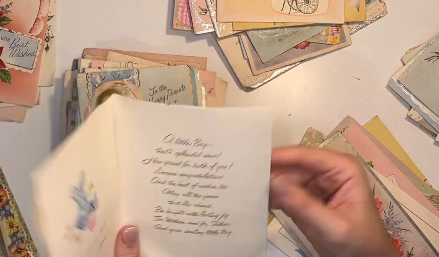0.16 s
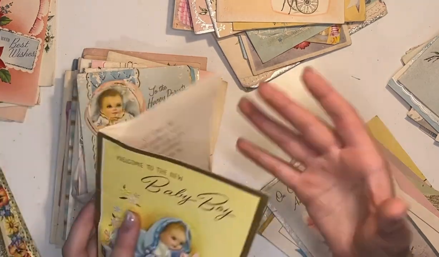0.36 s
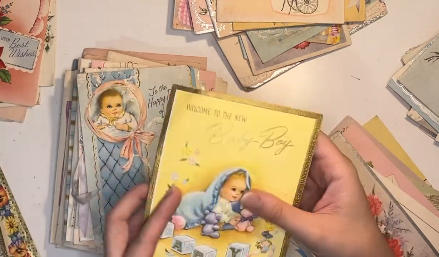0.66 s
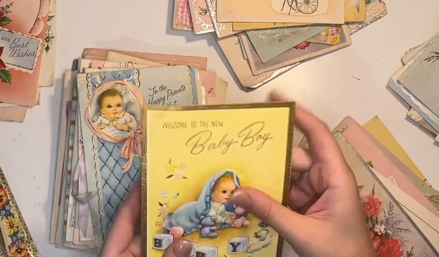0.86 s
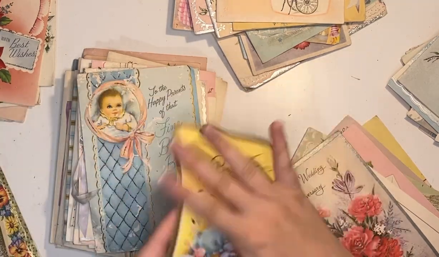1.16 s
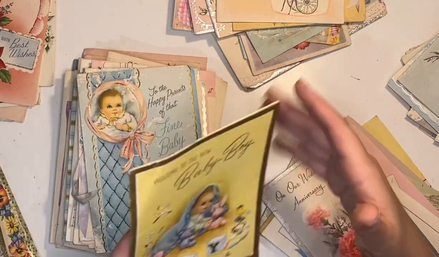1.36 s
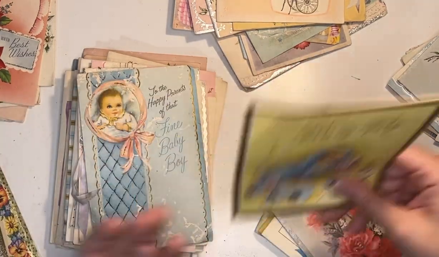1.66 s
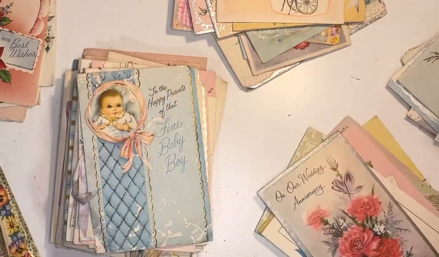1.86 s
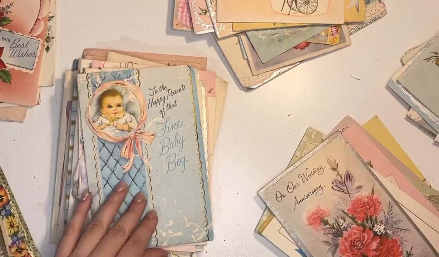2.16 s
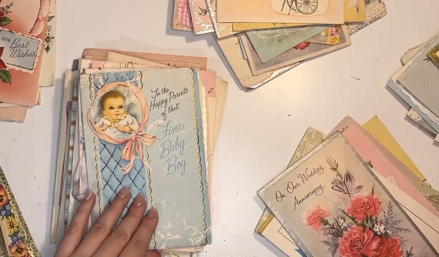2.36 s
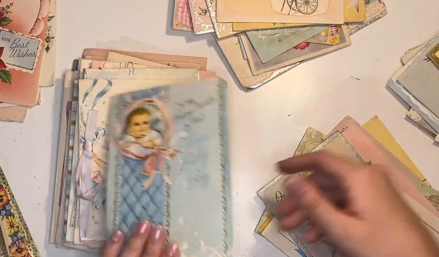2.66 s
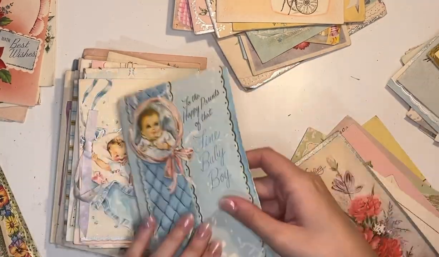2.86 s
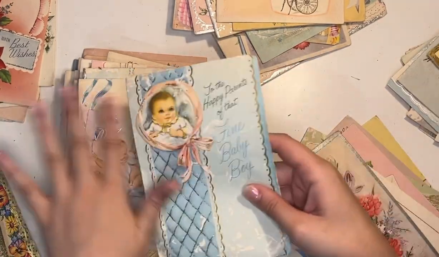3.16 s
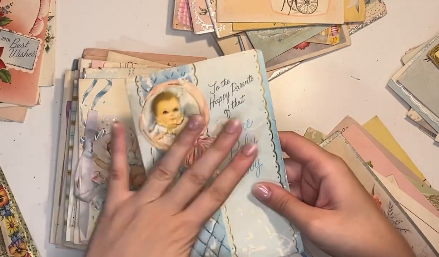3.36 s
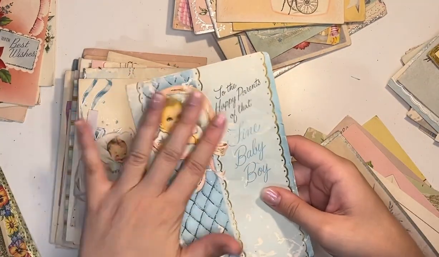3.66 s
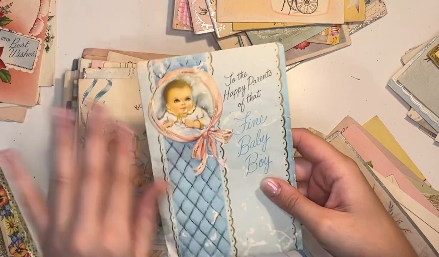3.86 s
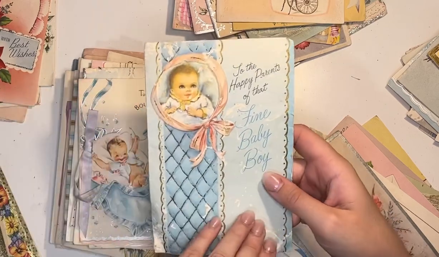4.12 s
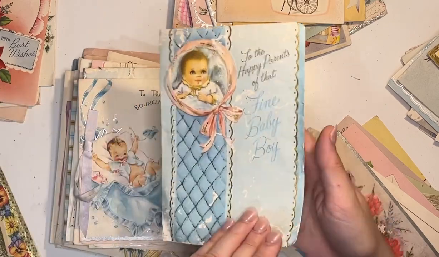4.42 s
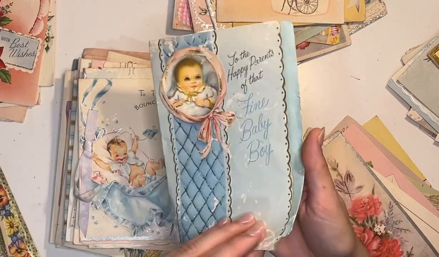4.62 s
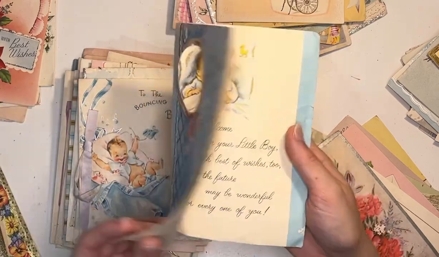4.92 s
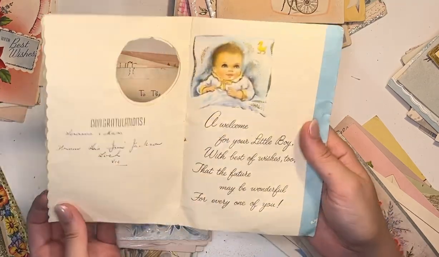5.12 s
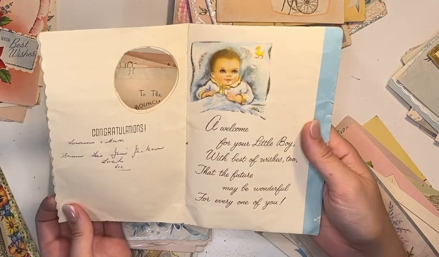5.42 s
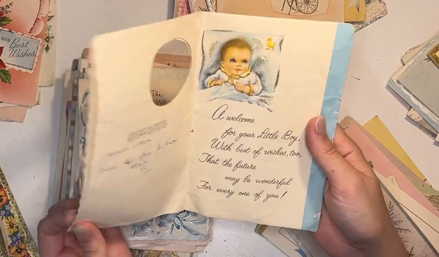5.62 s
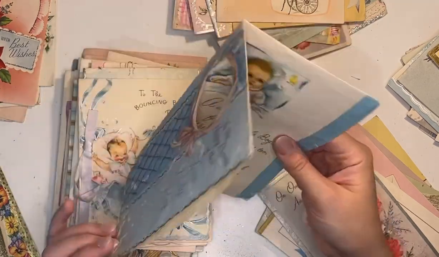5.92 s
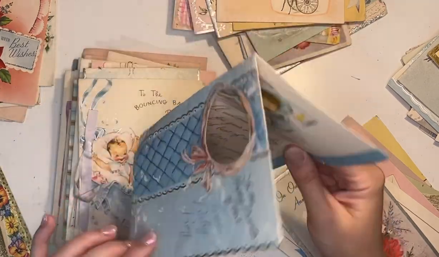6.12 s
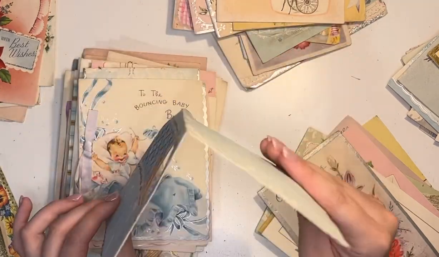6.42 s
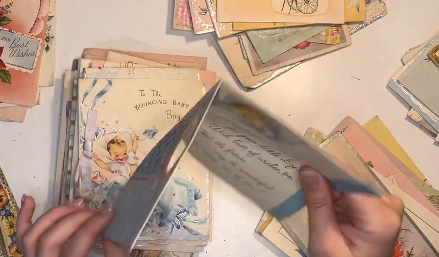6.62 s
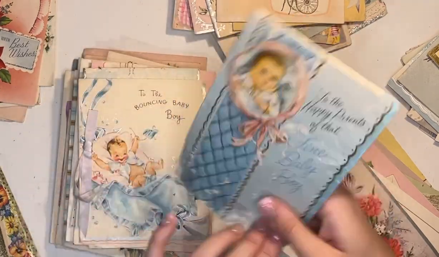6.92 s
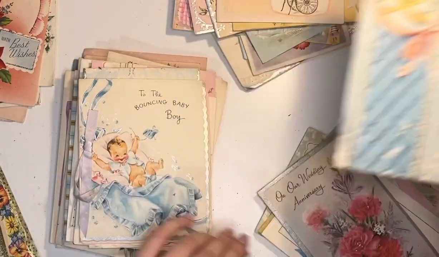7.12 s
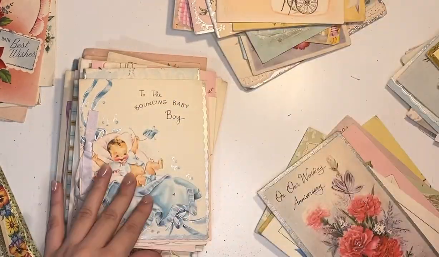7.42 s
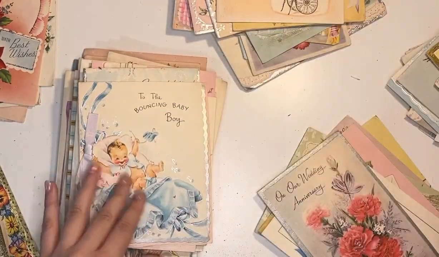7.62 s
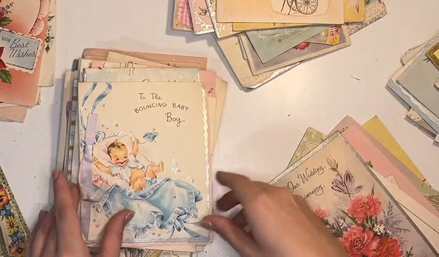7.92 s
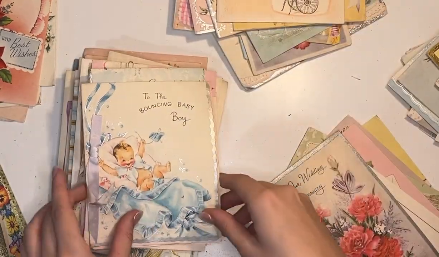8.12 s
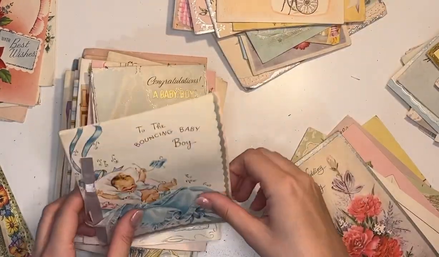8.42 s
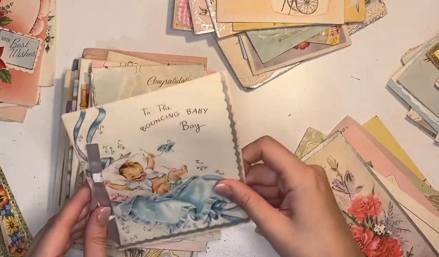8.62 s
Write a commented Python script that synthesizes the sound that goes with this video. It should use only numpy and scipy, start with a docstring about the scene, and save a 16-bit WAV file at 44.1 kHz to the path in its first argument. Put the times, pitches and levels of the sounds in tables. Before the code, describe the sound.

Old greeting cards are opened, flipped and tapped by hand, with irregular papery rustles, sharp little knocks and short hollow bumps, over faint rumble.

```python
"""Hands open, brush, flip and tap paper cards on a table, heard close and in stereo.
From the start skin and paper slide with a grainy hiss of filtered clicks, the sheets flap as resonances,
and fingertips tap and creases snap as short noise bursts. From 3 s dragged edges also ring with a
gliding pitch; from 6 s a half-open card booms as a decaying sine.
Throughout, a low rumble over faint hiss fills the small quiet room and scattered echoes follow the cards."""
import sys
import numpy as np
from scipy import signal
from scipy.fft import rfft, irfft
from scipy.io import wavfile
from scipy.ndimage import uniform_filter1d

SR = 44100
rng = np.random.default_rng(int(sys.argv[2]) if len(sys.argv) > 2 else 0)


def transcribe(u):
    """Save the signal u as a 16-bit wav file named by the first command-line argument.

    u: samples, shape (n,) or (channels, n), limited to [-1, 1]; the rate is SR.
    q: integer samples, one column per channel.
    """
    v = np.clip(np.atleast_2d(u).T, -1, 1)
    q = np.round(v * 32767).astype(np.int16)
    wavfile.write(sys.argv[1], SR, q)


N = 387198  # samples

# Strokes of skin or paper over paper:
# start t/s, length/s, hiss level at the end/dB, swell from start to end/dB
STROKE_EVENTS = [(0.0, 0.04, -60.5, -4.5), (0.053, 0.1, -44, 10), (0.235, 0.055, -53, 30),
                 (0.377, 0.11, -50, 6.5), (0.512, 0.22, -66.5, -19.5), (0.744, 0.17, -57.5, 19),
                 (1.129, 0.075, -42, 1), (1.293, 0.19, -73.5, -10.5), (1.488, 0.032, -48.5, 0),
                 (1.566, 0.045, -42, 10), (1.69, 0.33, -81.5, -24), (2.062, 0.28, -73.5, -14.5),
                 (2.445, 0.34, -55, 12), (2.841, 0.024, -48, 28), (2.961, 0.16, -34, 33.5),
                 (3.397, 0.034, -36.5, 9.5), (3.66, 0.049, -36.5, 16.5), (4.091, 0.023, -74, -7.5),
                 (4.224, 0.44, -51, 12), (4.709, 0.019, -40, 28), (4.83, 0.23, -54.5, 27),
                 (5.071, 0.03, -42.5, 16), (5.475, 0.068, -54, 21), (5.693, 0.11, -50.5, 12.5),
                 (5.855, 0.32, -65.5, -7.5), (6.24, 0.038, -60.5, 10), (6.404, 0.32, -51.5, 27.5),
                 (6.799, 0.15, -43, 15.5), (6.987, 0.056, -47, 11), (7.218, 0.13, -64, 33.5),
                 (7.376, 0.13, -62.5, -10.5), (7.686, 0.22, -73, 38), (8.019, 0.18, -72.5, -9),
                 (8.174, 0.16, -62.5, -8.5), (8.42, 0.056, -71, 8), (8.458, 0.29, -58.5, 5.5)]
# Spectrum of the sliding hiss: f/Hz, relative level per Hz/dB
HISS_SPECTRUM = [(1500, -14), (2120, -8.5), (2930, -14), (7000, -13), (9100, -13.5), (14000, -14),
                 (15800, -27)]
# Contact closes over GRIP_S; the hiss dies as the hand lifts
GRIP_S, LIFT_DB_PER_S = 0.0062, 259.5
# How hard the sheet flexes: t/s, flap level/dB
FLEX_CURVE = [(0.0, -68.5), (.49, -52), (.96, -86), (1.48, -68.5), (1.81, -92), (2.6, -87.5), (3.05, -58.5),
              (3.3, -88), (3.62, -72), (3.9, -104), (4.3, -70), (4.7, -53), (5.04, -76.5), (5.32, -101),
              (5.9, -69), (6.52, -78), (6.93, -51), (7.15, -85), (7.86, -90), (8.28, -76), (8.78, -67.5)]
# Modes of a flexing card: f/Hz, filter width/Hz, relative level/dB
SHEET_MODES = [(119, 35, 5), (287, 600, 0.5), (623, 220, -1), (956, 190, 1.5)]
# Modes of a scraped edge: f/Hz, filter width/Hz, relative level/dB
EDGE_MODES = [(2100, 600, 9.5), (2970, 2050, 2)]
EDGE_OVER_FLAP_DB = -3  # a flexing sheet also scrapes its edge
# Jerks of a dragged edge: start t/s, length/s, top level/dB, ring from f/Hz, ring to f/Hz
DRAG_EVENTS = [(3.012, 0.075, -56.5, 2050, 2700), (3.085, 0.022, -49, 2070, 3200),
               (4.372, 0.027, -49, 5030, 4000), (4.407, 0.039, -50.5, 3890, 3100),
               (4.458, 0.2, -47, 2800, 2000), (4.645, 0.062, -48.5, 5200, 2300)]
DRAG_SWELL_DB, DRAG_FADE_DB_PER_S = 2, 898
DRAG_RING_DB, DRAG_WIDTH_HZ = -1, 1200  # gliding ring: level over the pull, filter width
# Taps and snaps: t/s, level of the knock/dB, sheet pitch f/Hz,
# nominal crack level over the knock/dB, thud level over the knock/dB
TAP_EVENTS = [(0.059, -38, 2040, -19, -3), (0.078, -40.5, 2000, -14, -6.5), (0.176, -28.5, 1770, -26, -3.5),
              (0.322, -33, 2580, 3.5, -7), (0.345, -33, 2630, -23, -30), (0.449, -37.5, 1220, -23, 0.5),
              (0.472, -30.5, 1450, -30, -40), (0.649, -41.5, 495, 7, 0), (0.833, -42, 600, -8, -0.5),
              (1.132, -26, 520, -19.5, -1), (1.149, -27.5, 2650, -3.5, -22), (1.309, -28.5, 990, -26, -6.5),
              (1.603, -36.5, 1000, 8.5, -3), (1.959, -47.5, 620, -21, -2), (1.976, -41, 720, -22, -2.5),
              (2.067, -47.5, 1260, 4.5, 3), (2.557, -28, 2020, -24, -27), (2.752, -40, 990, 4, -8),
              (2.853, -45, 2820, -12.5, -7.5), (2.873, -26, 650, -18.5, -16), (2.933, -31, 660, -17.5, -2),
              (3.129, -27.5, 860, 1.5, -3.5), (3.136, -23, 2160, -6, -21), (3.144, -32, 780, 15, 2.5),
              (3.153, -44, 1010, -18.5, -17.5), (3.397, -38.5, 585, -5, 9.5), (3.447, -27, 700, 1, -4),
              (3.457, -18.5, 620, -9.5, -11.5), (3.468, -34, 1320, -14, -16),
              (3.667, -37.5, 593, -27.5, 1.5), (3.721, -30, 770, -21, -4), (4.226, -35.5, 810, -45, -4),
              (4.725, -31, 956, -32, -7), (4.741, -23.5, 2460, -30, -8), (5.062, -42, 596, -31.5, 6),
              (5.083, -36, 623, -19, -3), (5.146, -31.5, 2820, -2, -5.5), (5.733, -35, 800, -24, -1),
              (5.774, -37.5, 500, -19, 1), (5.98, -49, 705, -5.5, 8), (6.085, -26.5, 1440, -43, -5.5),
              (6.296, -45.5, 675, -31, 8), (6.534, -47, 750, -31, 3), (6.572, -48.5, 1840, -32, 10.5),
              (6.8, -45, 2500, -21.5, -4), (6.85, -40.5, 1520, 4, -5.5), (6.879, -39, 1110, -16, -1),
              (6.948, -30.5, 510, -19, -2.5), (6.975, -36.5, 2100, -13, -17),
              (7.043, -30.5, 2010, -20, -8.5), (7.439, -50.5, 800, -18, 1), (8.192, -34, 2130, -12, -34),
              (8.212, -27, 1750, -31, -15.5), (8.426, -48.5, 1050, -23, -10),
              (8.576, -50.5, 605, -18, -7.5)]
# Modes of a struck card: f/Hz, filter width/Hz, relative level/dB
KNOCK_MODES = [(640, 160, 1), (1210, 370, 4.5), (1740, 500, 1.5)]
# Hard taps are short, soft ones linger: knock level/dB, decay time of the blow by 60 dB/s
TAP_DECAY = [(-46, 0.05), (-38, 0.03), (-28, 0.022)]
# Snaps of creases in the paper: t/s, peak level/dB
CREASE_SNAPS = [(0.0588, -55), (0.08, -36), (0.27, -51), (0.2867, -50), (0.343, -24.5), (0.62, -42),
                (0.728, -42), (0.795, -47), (1.196, -25), (2.069, -44), (3.717, -21), (5.264, -54),
                (5.3132, -58), (5.4076, -56), (5.4282, -53), (5.455, -57), (5.4814, -65), (6.0247, -39),
                (6.868, -32), (7.5794, -46.5),]
# Booms of the half-open card, like a small box: t/s, initial level/dB
BOX_BOOMS = [(6.089, -21.5), (6.121, -34), (6.143, -45), (6.16, -46), (6.407, -40), (6.976, -33),
             (7.075, -37), (7.224, -52)]
BOX_HZ, BOX_T60_S = 302, 0.057
# Stereo width: f/Hz, side over mid level/dB
SIDE_OVER_MID = [(40, -11), (150, -14), (700, -6.5), (1250, -4.5), (1600, 6.5), (1750, -11.5), (2400, -14),
                 (4500, -45.5), (6000, -22), (11000, -20), (14000, -28.5)]
# Spectrum of the room's air: f/Hz, relative level per Hz/dB
AIR_SPECTRUM = [(26, -46), (40, -7), (55, -8.5), (120, -14), (220, -30.5), (450, -37), (2900, -59.5),
                (3300, -45.5), (3700, -56), (15500, -47)]
AIR_DB, AIR_SWELL_DB = -64, 2.5  # middle level, rms size of its swell
# Phase of right over left: f/Hz, phase/turns
STEREO_PHASE = [(5200, 0), (5600, .1), (7300, .3), (7900, .5), (8900, .5), (9400, .62), (10900, .92),
                (11300, 1), (12900, 1), (13400, 1.18), (14400, 1.4), (15000, 1.5)]
BAND_EDGE_HZ = 15860


def handling():
    """Friction and flexure: sliding hisses, a dragged edge rings, the sheet flaps and shakes the table."""
    t = np.arange(N) / SR
    flap_db = np.interp(t, *np.transpose(FLEX_CURVE))
    fine = grit(per_s=2400, spread_db=1.5, smooth=0.7, flutter_db=1.35)
    coarse = grit(per_s=650, spread_db=0.5, smooth=0.78, flutter_db=7.0)
    rasp = grit(per_s=1900, spread_db=5.0, smooth=1.2, flutter_db=2.5)
    fibre_snaps = grit(per_s=81, spread_db=5.5, smooth=0, flutter_db=1.5)
    crackle = ring(fibre_snaps, [(3700, 12000, 0)])

    grain = patchy(colour(fine, HISS_SPECTRUM), patch_db=2.5)
    hiss = strokes(t) * (grain + amp(-14) * crackle)

    pull, ring_hz = drag(t)
    edge = (amp(flap_db + EDGE_OVER_FLAP_DB) + pull) * ring(rasp, EDGE_MODES)
    edge += amp(DRAG_RING_DB) * pull * glide(rasp, ring_hz, DRAG_WIDTH_HZ)

    flap = amp(flap_db) * ring(coarse, SHEET_MODES)
    shake_db = -57.0 + 0.27 * (flap_db + 54.0)  # the table follows the flap only in part
    table_modes = [(55.0, 24, 1.0), (94, 170, -18.0)]
    shake = amp(shake_db) * ring(rng.standard_normal(N), table_modes)
    return hiss + edge + flap + shake


def strokes(t):
    """Addition of incoherent powers: each stroke grips, swells or slackens evenly in dB, and dies away."""
    power = np.zeros(N)
    for start, length, end_db, swell_db in STROKE_EVENTS:
        first = max(round((start - GRIP_S) * SR), 0)
        at = slice(first, round((start + length + .4) * SR))
        left = start + length - t[at]  # seconds to the end; negative during the lift
        level_db = end_db - swell_db * np.clip(left / length, 0, 1)
        level_db += LIFT_DB_PER_S * np.minimum(left, 0)
        grip = np.clip(1 + (t[at] - start) / GRIP_S, 0, 1)
        power[at] += (grip * amp(level_db)) ** 2
    return np.sqrt(power)


def grit(per_s, spread_db, smooth, flutter_db):
    """Stick-slip of fibres: sparse clicks of uneven size in smooth noise, with an uneven grip."""
    size = amp(spread_db * np.minimum(rng.exponential(1, N), 4))
    clicks = size * (rng.random(N) < per_s / SR)
    clicks *= rng.choice([-1., 1.], N)
    grip = uniform_filter1d(rng.standard_normal(N), size=400)
    grip = evened(uniform_filter1d(grip, size=400))
    return (evened(clicks) + smooth * rng.standard_normal(N)) * amp(flutter_db * grip)


def patchy(x, patch_db):
    """Modulation by moving contact over the paper's grain: bands swell and fade in small patches."""
    bands = signal.stft(x, nperseg=256)[2]
    # smoothed over about 35 ms and 1 kHz
    patches = uniform_filter1d(rng.standard_normal(bands.shape), size=12, axis=1)
    patches = uniform_filter1d(patches, size=6, axis=0)
    bands = bands * amp(patch_db * evened(patches))
    return evened(signal.istft(bands, nperseg=256)[1][:N])


def drag(t):
    """Jerky friction: each jerk swells a little and stops short; gives the gain and the ring's pitch."""
    gain, hz = np.zeros(N), np.full(N, float(DRAG_EVENTS[0][3]))
    for start, length, top_db, from_hz, to_hz in DRAG_EVENTS:
        done = np.clip((t - start) / length, 0, 1)
        level_db = top_db - DRAG_SWELL_DB * (1 - done)
        level_db -= DRAG_FADE_DB_PER_S * np.maximum(t - start - length, 0)
        grip = np.clip((t - start) / GRIP_S, 0, 1)
        gain = np.maximum(gain, grip * amp(level_db))
        hz = np.where(t >= start, from_hz + (to_hz - from_hz) * done, hz)
    return gain, hz


def glide(x, hz, width_hz):
    """Heterodyne resonance: shifts the curve hz down to zero, smooths there, and shifts back."""
    turn = np.exp(2j * np.pi * np.cumsum(hz) / SR)
    r = np.exp(-np.pi * width_hz / SR)
    smoothed = signal.lfilter([1], np.convolve([1, -r], [1, -r]), x / turn)
    return evened((turn * smoothed).real)


def taps():
    """Impact excitation: a short crack, the card's knock with the struck patch ringing, a dull thud."""
    out, t = np.zeros(N + 6000), np.arange(6000) / SR
    fingertip = signal.butter(4, 3600, fs=SR, output="sos")  # softness removes treble
    thud_modes = [(297, 170, -1.5), (189.4, 223, 3), (385.0, 540, -1.5)]
    noises = rng.standard_normal((len(TAP_EVENTS), 3, 6000))
    for (s, db, hz, crack_db, thud_db), (blow_noise, crack_noise, thud_noise) in zip(TAP_EVENTS, noises):
        t60 = np.interp(db, *np.transpose(TAP_DECAY))
        blow = blow_noise * np.minimum(t / 0.001, 1) * amp(-60 * t / t60)
        blow = signal.sosfilt(fingertip, blow)
        knock = ring(blow, [(hz, 0.39 * hz + 60, 0)]) + 0.52 * ring(blow, KNOCK_MODES)
        bright = crack_noise - 0.78 * np.roll(crack_noise, 1)
        crack = bright * (amp(-60 * t / 0.029) + 0.54 * amp(-60 * t / 0.091))  # snap, then a short fizz
        thud = ring(thud_noise * amp(-60 * t / (3.43 * t60)), thud_modes)
        tap = knock / abs(knock).max()
        tap += amp(crack_db) * crack / 3 + amp(thud_db) * thud / abs(thud).max()
        out[round(s * SR):][:6000] += amp(db) * tap
    return out[:N]


def ticks():
    """Sudden release of creases: snaps a few milliseconds long, to which the sheet lends its middle ring."""
    out, t = np.zeros(N), np.arange(600) / SR
    for (s, db), noise in zip(CREASE_SNAPS, rng.standard_normal((len(CREASE_SNAPS), 600))):
        snap = noise * amp(-60 * t / 0.0085)
        snap = snap + 1.8 * resonate(snap, 3000, 3500)
        out[round(s * SR):][:600] += amp(db) * snap / abs(snap).max()
    return out


def hollow():
    """Cavity resonance: one low mode, slightly detuned each time, starts softly and decays."""
    out, t = np.zeros(N), np.arange(6000) / SR
    for (s, db), detune in zip(BOX_BOOMS, rng.standard_normal(len(BOX_BOOMS))):
        hz = BOX_HZ * (1 + 0.028 * detune)
        boom = np.sin(2 * np.pi * hz * t) * np.minimum(t / 0.0023, 1)
        out[round(s * SR):][:6000] += amp(db - 60 * t / BOX_T60_S) * boom
    return out


def scatter(x, t60):
    """Diffuse reverberation: dense reflections of random sign and size that die away exponentially."""
    t = np.arange(round(SR / 2)) / SR
    tail = rng.standard_normal(len(t)) * amp(-60 * t / t60)
    return signal.oaconvolve(x, tail / np.linalg.norm(tail))[:N]


def decorrelated(x):
    """Decorrelation: random phase, smoothed over time and pitch, makes the side diffuse."""
    bands = signal.stft(x, nperseg=512)[2]
    phase = uniform_filter1d(rng.standard_normal(bands.shape), size=6, axis=1)
    phase = uniform_filter1d(phase, size=3, axis=0)
    bands = bands * np.exp(3j * evened(phase))  # 3 rad rms
    return signal.istft(bands, nperseg=512)[1][:N]


def room_air():
    """Stationary background noise: a low rumble over a faint hiss, together swelling slowly."""
    swell = evened(uniform_filter1d(rng.standard_normal(N), size=6000))
    air = evened(colour(rng.standard_normal(N), AIR_SPECTRUM))
    return amp(AIR_DB + AIR_SWELL_DB * swell) * air


def amp(db):
    """Definition of the decibel: level to amplitude ratio."""
    return 10 ** (np.asarray(db) / 20)


def evened(x):
    """Normalization to an rms value of 1."""
    return x / np.sqrt(np.mean(x ** 2) + 1e-20)


def read(points, hz):
    """Interpolation of a curve along logarithmic frequency."""
    f, value = np.transpose(points)
    return np.interp(np.log(hz + 1), np.log(f + 1), value)


def colour(x, points):
    """Linear filtering: multiplies the spectrum by a gain curve in dB."""
    gain = amp(read(points, np.fft.rfftfreq(len(x), 1 / SR)))
    return irfft(rfft(x) * gain, len(x))


def resonate(x, hz, width):
    """Damped oscillator: a two-pole resonance of peak gain 1."""
    return signal.lfilter(*signal.iirpeak(min(hz, SR / 3), hz / width, SR), x)


def ring(x, modes):
    """Modal superposition: each mode filters twice, and the sum has rms 1."""
    parts = (amp(db) * resonate(resonate(x, hz, width), hz, width) for hz, width, db in modes)
    return evened(sum(parts))


def scene():
    """Superposition of the cards, their reverberation and the room, spread to two channels as mid and side."""
    cards = handling() + taps() + ticks() + hollow()
    echo_spectrum = [(300, -1.5), (700, -8), (2000, -7.0), (8000, -10.5)]  # f/Hz, level/dB
    echoes = amp(-2.5) * colour(scatter(cards, 0.33), echo_spectrum)
    mid = cards + echoes + room_air()
    side = colour(decorrelated(mid), SIDE_OVER_MID)
    return np.array([mid + side, mid - side])


def record(dry):
    """Stereo phase: a typed curve turns right ahead of left in the treble; then the band is limited."""
    turns = read(STEREO_PHASE, np.fft.rfftfreq(N, 1 / SR))
    rotation = np.exp(1j * np.pi * np.array([-turns, turns]))  # half the phase on each channel
    channels = irfft(rfft(dry) * rotation, N)
    bass_cut = signal.butter(4, 34, "high", fs=SR, output="sos")  # of the capsule
    channels = signal.sosfilt(bass_cut, channels)
    treble_cut = signal.firwin(511, BAND_EDGE_HZ, window=("kaiser", 9), fs=SR)
    return signal.oaconvolve(channels, treble_cut[None], "same")


dry = scene()
out = record(dry)
transcribe(out)
```